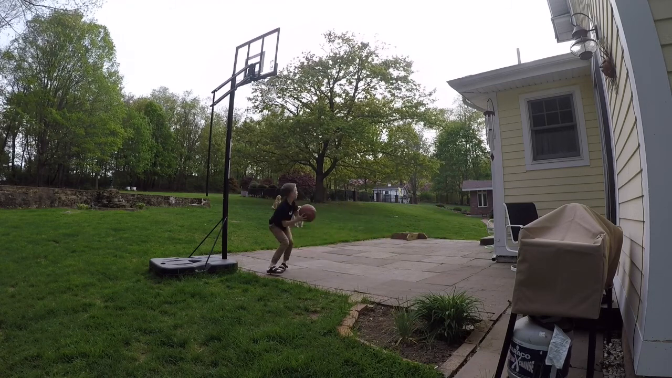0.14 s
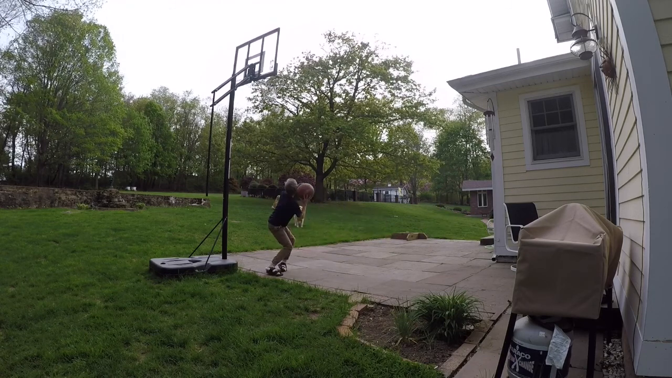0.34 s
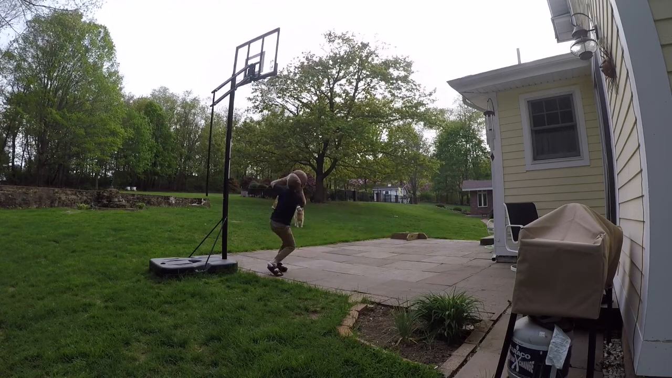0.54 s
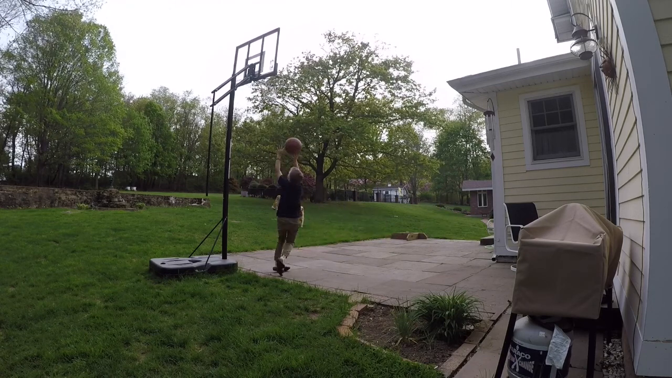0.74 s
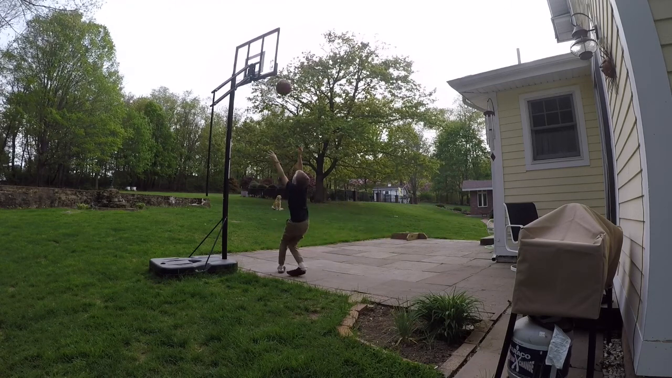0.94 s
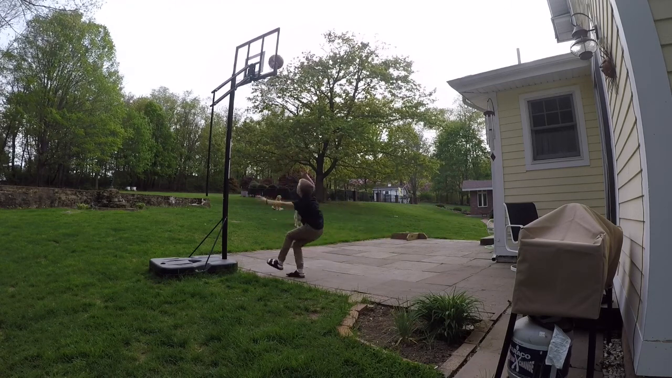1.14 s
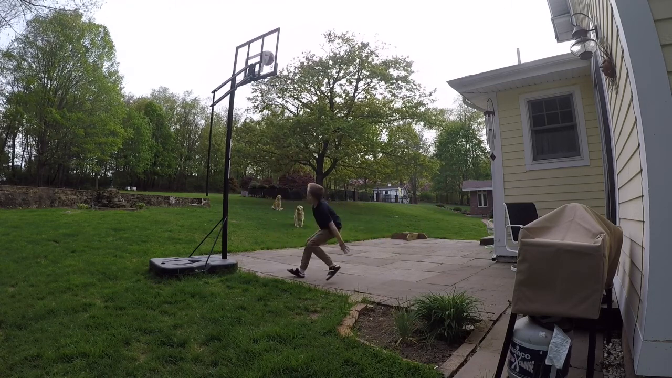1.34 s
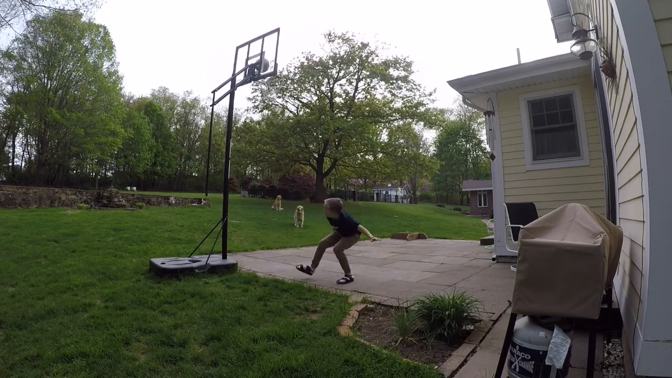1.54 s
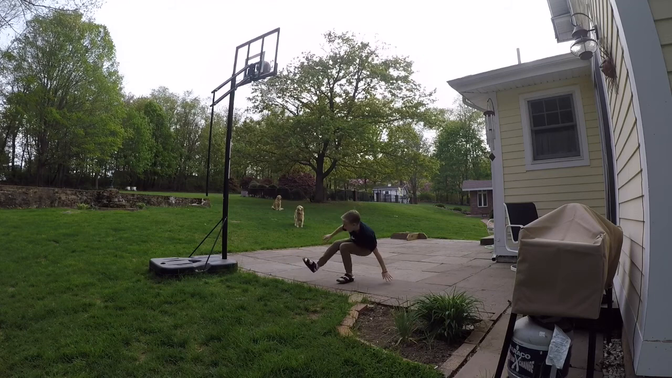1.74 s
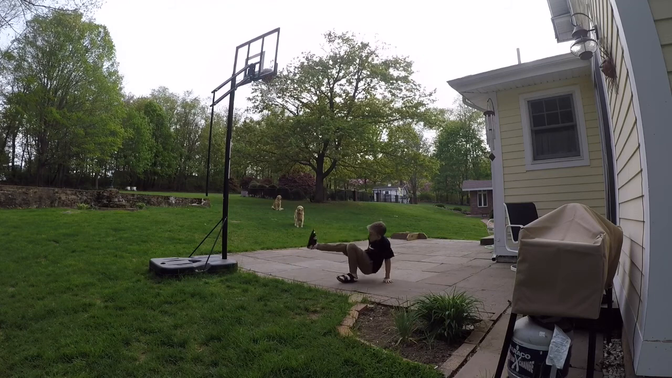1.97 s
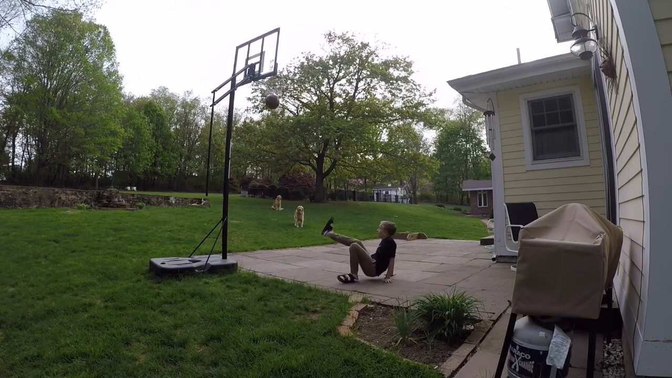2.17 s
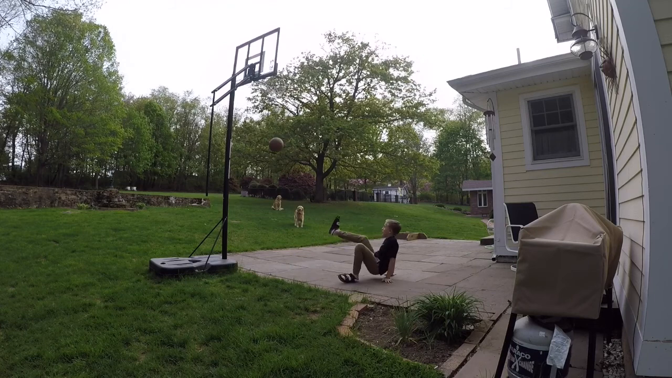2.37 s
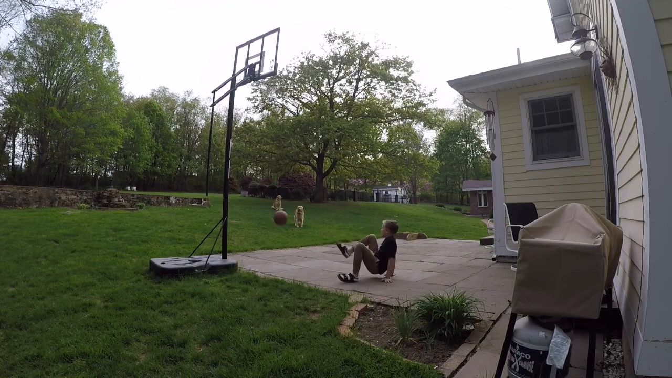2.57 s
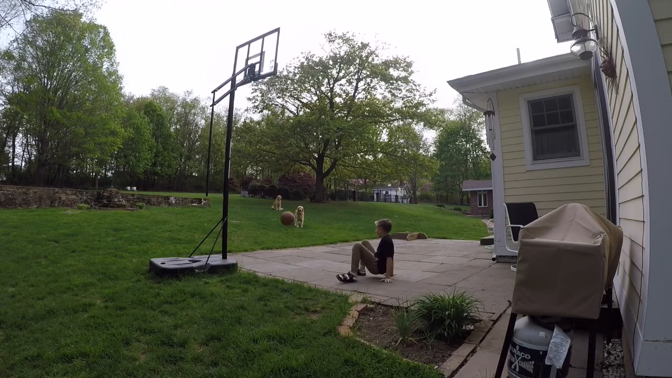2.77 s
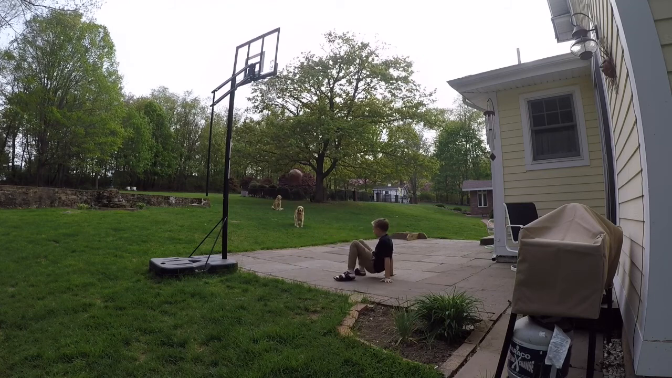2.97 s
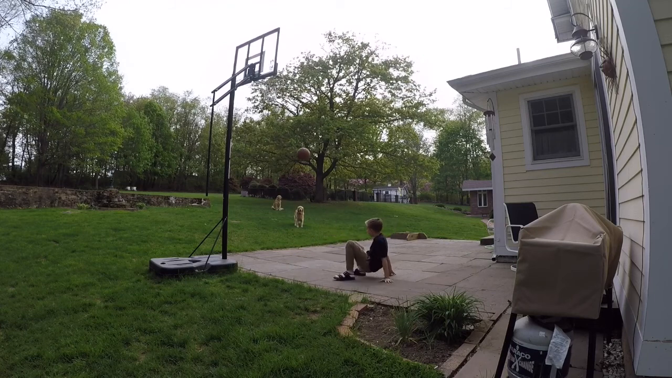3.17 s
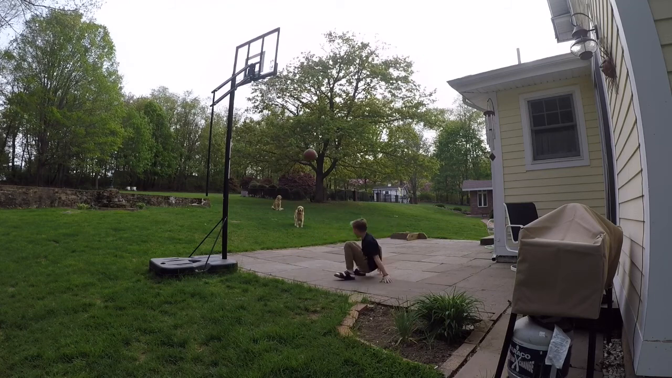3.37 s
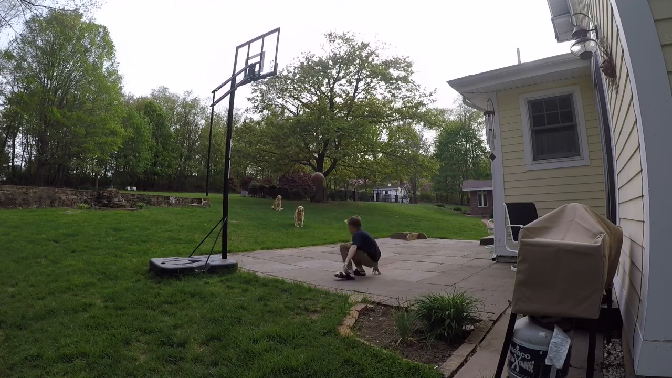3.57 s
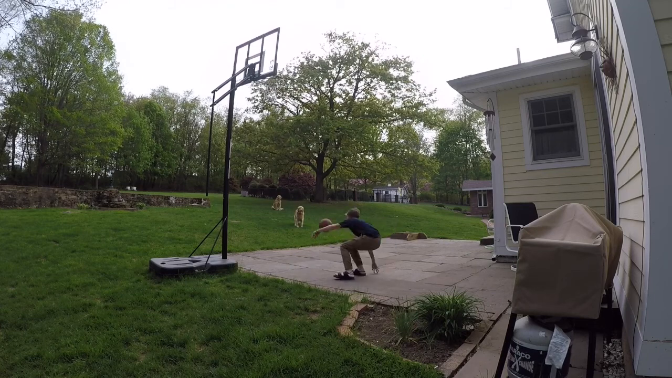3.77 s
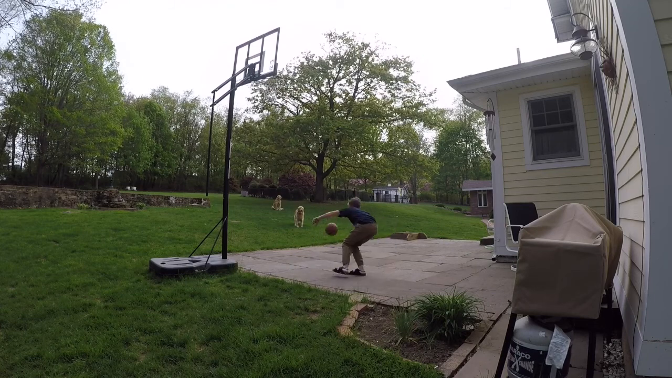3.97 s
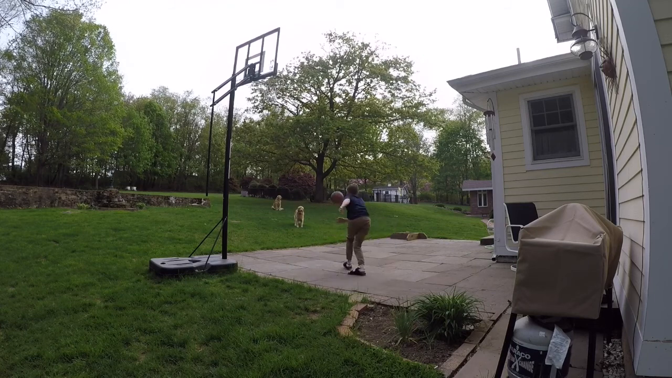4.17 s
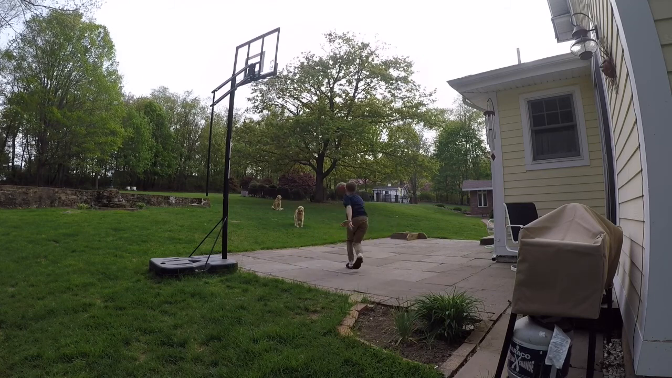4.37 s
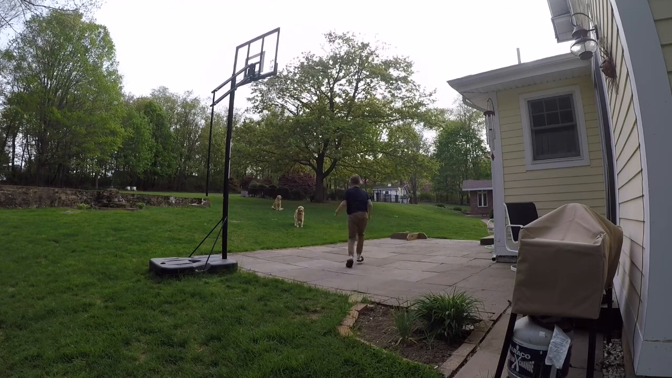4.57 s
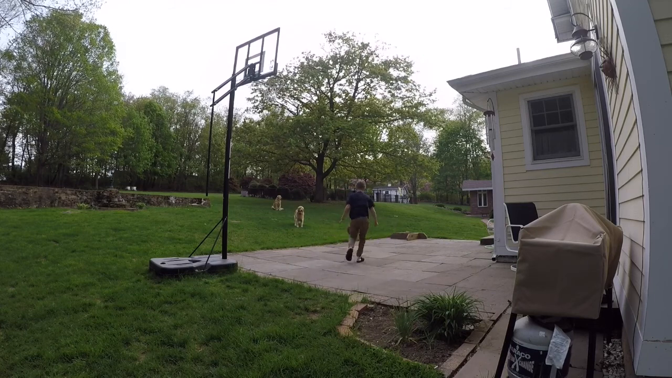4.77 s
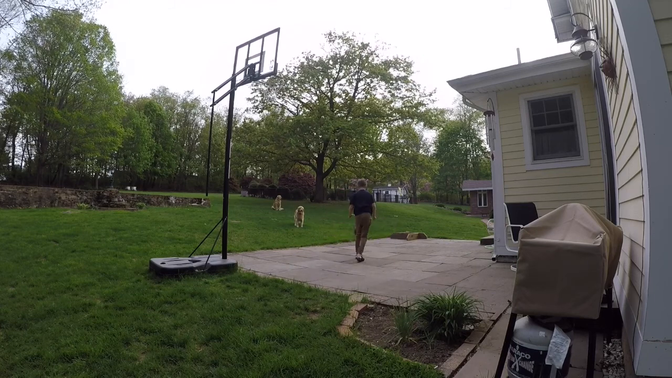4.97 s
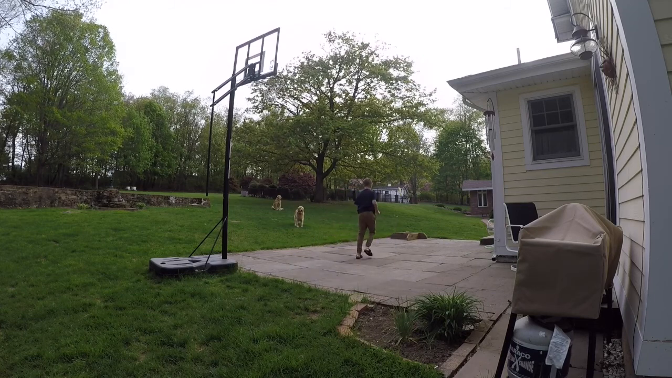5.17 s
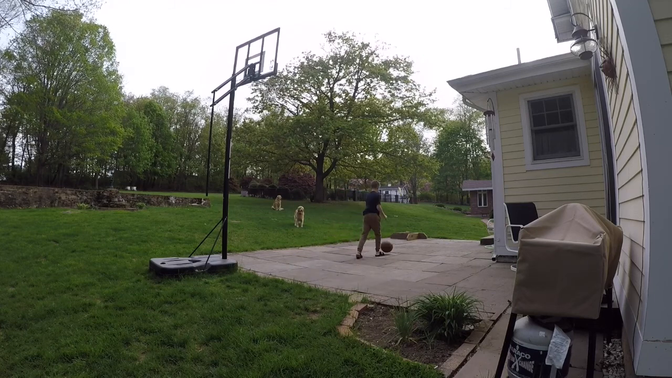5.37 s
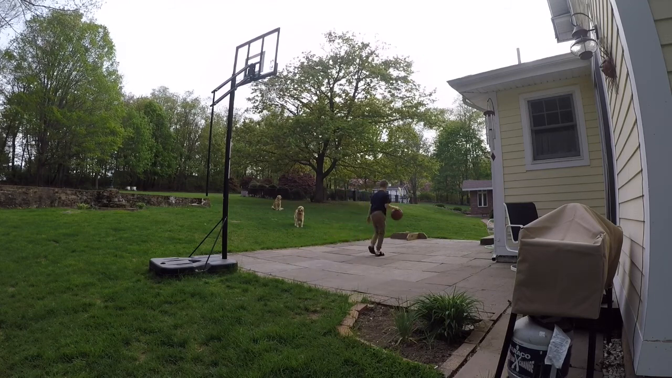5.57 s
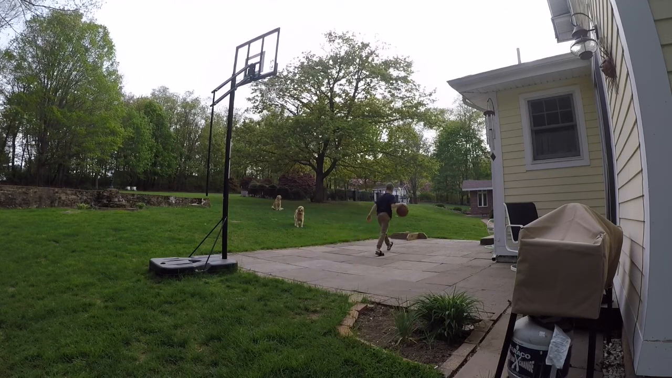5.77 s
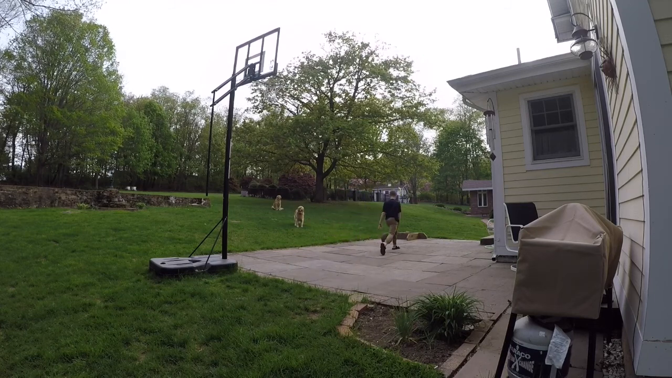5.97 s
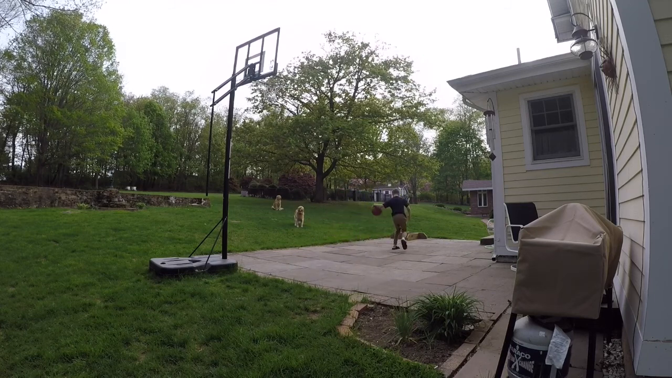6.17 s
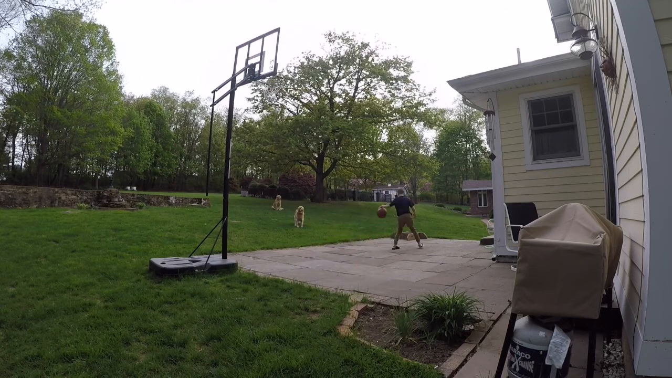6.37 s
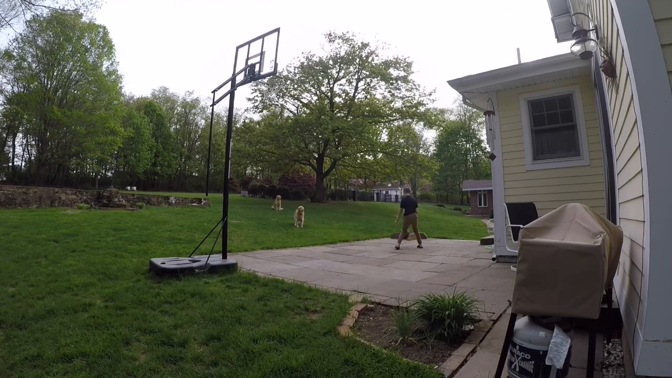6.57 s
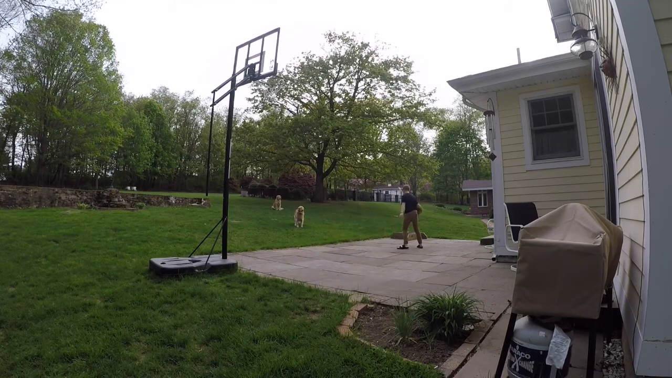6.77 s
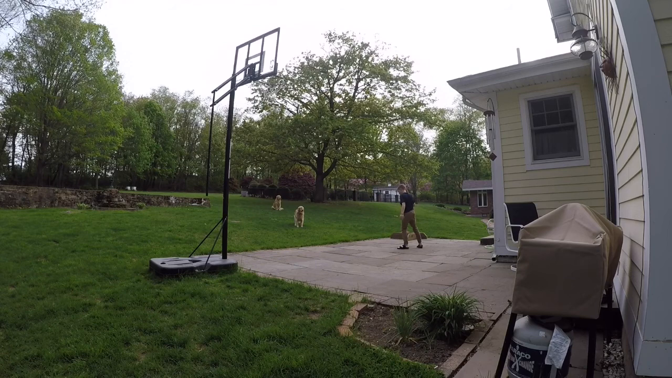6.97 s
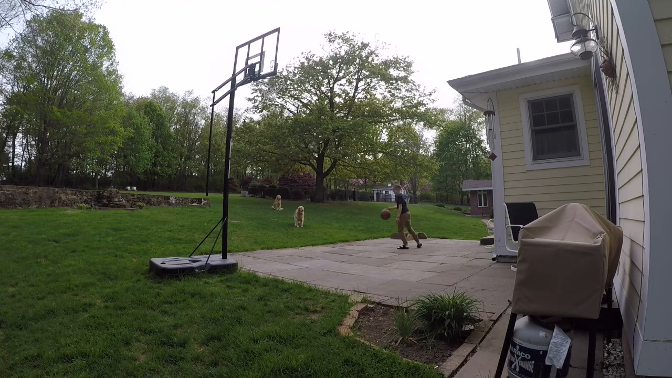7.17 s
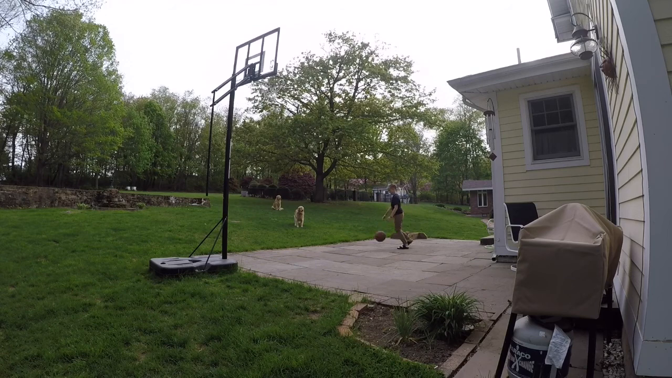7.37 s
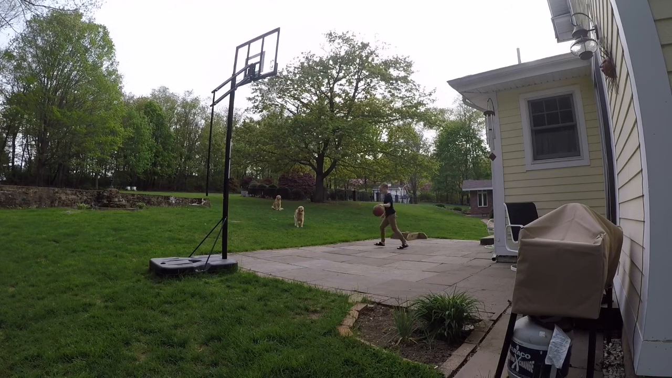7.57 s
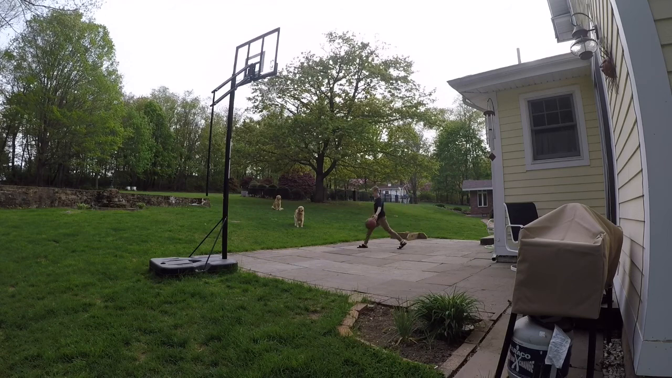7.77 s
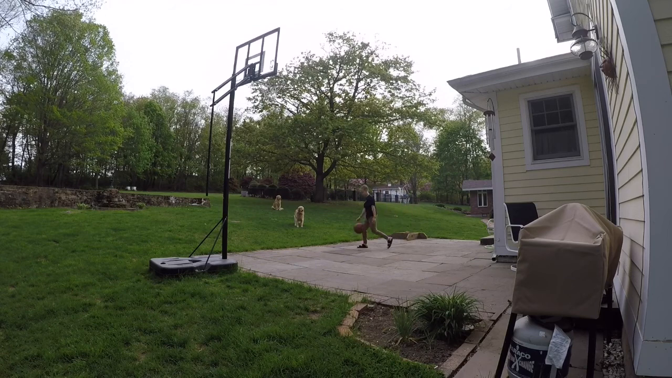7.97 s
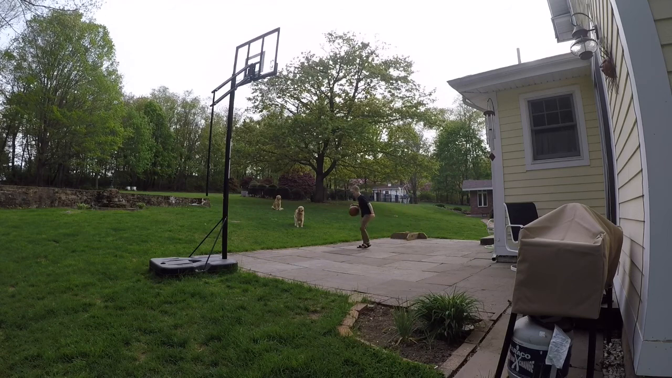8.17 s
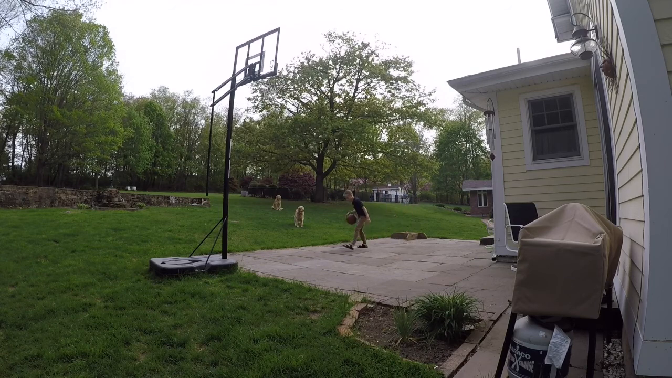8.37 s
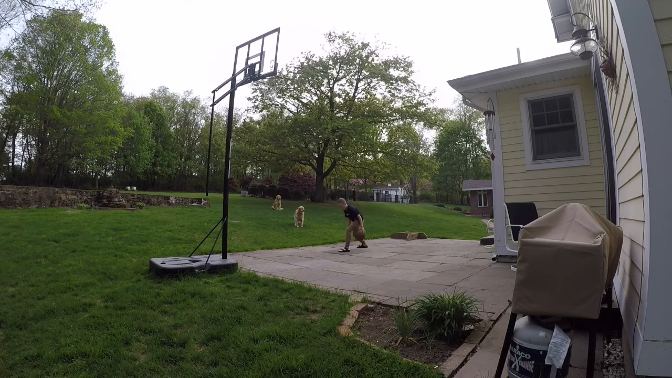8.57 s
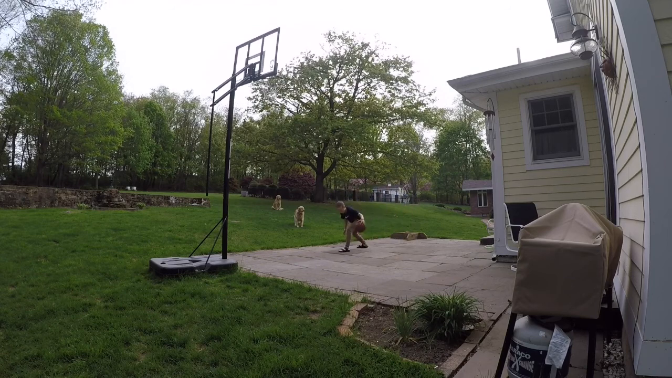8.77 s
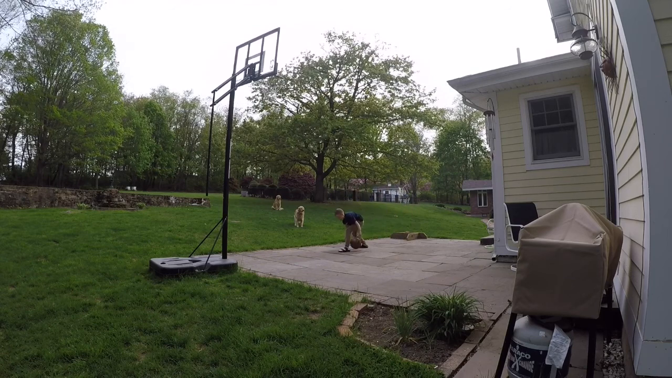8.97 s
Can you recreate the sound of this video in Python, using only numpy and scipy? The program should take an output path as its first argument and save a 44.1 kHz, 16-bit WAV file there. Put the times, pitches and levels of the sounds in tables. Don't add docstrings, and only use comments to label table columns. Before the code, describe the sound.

Outdoors, sandals skid, a hoop clatters, and a ball cracks on stone at uneven intervals above distant traffic, with a late gust buffeting the microphone.

```python
import sys
import numpy as np
from scipy import signal
from scipy.io import wavfile

SR = 44100
rng = np.random.default_rng(int(sys.argv[2]) if len(sys.argv) > 2 else 0)


def to_wav(s):
    ch = np.atleast_2d(s).T
    pcm = np.round(np.clip(ch, -1, 1) * 32767)
    wavfile.write(sys.argv[1], SR, pcm.astype(np.int16))


def voltage_ratio(decibels):
    exponent = np.asarray(decibels, float) / 20
    return 10 ** exponent


N = 397341


def rms_one(x):
    return x / np.sqrt(np.mean(x ** 2) + 1e-20)


def in_time(rows):
    s, level = np.transpose(rows)
    return np.interp(np.arange(N) / SR, s, level)


def at_hz(points, hz):
    table_hz, values = np.transpose(points)
    return np.interp(np.log(hz), np.log(table_hz + 1), values)


def passed(x, hz, kind, order=2):
    return signal.sosfilt(signal.butter(order, np.clip(hz, 10, .45 * SR), kind, fs=SR, output="sos"), x)


def drift(rate_hz):
    r = np.exp(-80 * np.pi * rate_hz / SR)
    noise = rng.standard_normal(N // 40 + 2002)
    slow = signal.lfilter([1], [1, -2 * r, r * r], noise)[2000:]
    return np.interp(np.arange(N) / 40, np.arange(len(slow)), rms_one(slow))


def ring(clicks, modes):
    out = 0
    for hz, db, t60 in modes:
        r = voltage_ratio(-60 / (t60 * SR))
        w = 2 * np.pi * hz / SR
        out = out + signal.lfilter([0, voltage_ratio(db) * np.sin(w)], [1, -2 * r * np.cos(w), r * r], clicks + 1e-18)
    return out


def add(track, s, sound):
    i = round(s * SR)
    track[i:i + len(sound)] += sound[:N - i]


def grit(size, per_s, spread_db):
    chance, size_draw, sign_draw = rng.random((size, 3)).T
    height = voltage_ratio(-spread_db * np.log(size_draw + 0.011))
    return (chance < per_s / SR) * height * np.sign(sign_draw - .5)


def ball():
    # (time [s], crack [dB], deep thump [dB], high thump [dB], enclosed air [dB])
    bounces = [
        (2.7182, 2.5, -14, -24.5, -17.5),
        (3.9289, -3.5, -20, -20, -19.5),
        (4.911, -11, -22.5, -25, -22),
        (5.4117, -1, -23, -22.5, -21),
        (5.9937, -2, -19.5, -15.5, -16),
        (6.5864, -22, -23, -19.5, -22.5),
        (7.3836, -6.5, -23, -10.5, -20),
        (7.9318, -9, -20, -15.5, -21.5),
        (8.5681, -7.5, -19, -8.5, -21.5),
    ]
    # (pitch [Hz], level [dB], time to fall 60 dB [s])
    shell_deep = [(152, 8, 0.083), (176, -15.5, 0.2)]
    shell_high = [(269, -7, 0.061), (263, 7.5, 0.057)]
    shell_knock = [(472, 0, 0.012), (475.4, 0, 0.15), (690, 0, 0.02), (895, 0.92, 0.031)]
    crack_hz, dulling_octaves_per_db = 4720, .04
    deep_lag_s, high_lag_s = 0.002, 0.00273
    hit, bare, t = np.zeros(N), np.zeros(N), np.arange(6000) / SR
    push = np.sin(np.pi * np.clip(t / 0.00094, 0, 1)) / (0.0012 * SR)
    click = (t == t[20]) * 1.
    for s, crack_db, deep_db, high_db, air_db in bounces:
        flat_db = high_db + 22
        upper_db = air_db + 1.5 + 0.21 * flat_db
        skin_db = -22 - 0.44 * flat_db
        peeling = rng.standard_normal(len(t)) * np.exp(-t / .0016) * (t > t[26])
        patter = click + .15 * peeling
        crack_band = crack_hz * 2 ** (np.array([-.6, .6]) - dulling_octaves_per_db * flat_db)
        crack = voltage_ratio(crack_db + 11) * passed([patter, click], crack_band, "band", order=1)
        skin = voltage_ratio(skin_db + 29) * passed([patter, click], [1400, 3600], "band")
        skin_hz = 2100 * rng.uniform(1.0, 1.103)
        tones = ring(click, [(1154, air_db, .02), (1462, upper_db, .018), (skin_hz, skin_db + 4, .008)])
        add(hit, s, crack[0] + skin[0] + tones + voltage_ratio(-37.5) * ring(click, shell_knock))
        add(hit, s + deep_lag_s, -voltage_ratio(deep_db + 6.5) * ring(push, shell_deep))
        add(hit, s + high_lag_s, -voltage_ratio(high_db - 7) * ring(push, shell_high))
        add(bare, s, crack[1] + skin[1])
    return hit, bare


def hoop():
    # (time [s], peak [dB], low body [dB])
    knocks = [
        (1.5276, -21.5, -25),
        (1.5454, -27, -22.5),
        (1.578, -16.5, -21),
        (1.5975, -16.5, -28),
        (1.6213, -26, -50),
        (1.6448, -31, -27.5),
        (1.73, -29, -31),
        (1.824, -29, -29),
        (1.8653, -22, -30.5),
        (2.0037, -34.5, -37.5),
    ]
    # (pitch [Hz], level [dB], time to fall 60 dB [s])
    board_tones = [(168.2, 1.5, 0.4), (272.6, -1, 0.21), (357, 2, 0.11), (394, -2.5, 0.26), (440, 0, 0.053),
                   (743, -2, 0.18)]
    rim_tones = [(1000, 0, .03), (1180, -2, .04), (1750, 0, .03), (3485, -12, .06), (3750, -10, .02),
                 (4250, -12, .05)]
    chatter_t60_s = 0.22
    out, t = np.zeros(N), np.arange(16000) / SR
    for s, db, low_db in knocks:
        chatter = grit(len(t), 4000, 4) * voltage_ratio(-60 * t / chatter_t60_s) * np.clip(t / .003, 0, 1)
        bright = passed(chatter, [2600, 6500], "band", order=1)
        hollow = voltage_ratio(11.5 + .25 * (low_db + 20.5)) * passed(chatter, [500, 2000], "band", order=1)
        rim = voltage_ratio(db - 6.5) * (bright + hollow + 0.038 * ring(chatter, rim_tones))
        add(out, s, rim + voltage_ratio(low_db - 33.5) * ring(chatter, board_tones))
    return out


def squeaks():
    # (time [s], level [dB], pitch [Hz], length [s])
    squeak_times = [
        (2.062, -42, 1306, 0.013),
        (2.075, -52, 1270, 0.032),
        (2.176, -40.5, 1280, 0.019),
        (2.189, -48, 1266, 0.032),
    ]
    # (multiple of the pitch, level [dB])
    overtones = [(1, 0.5), (2, -3), (3, -6), (4, -12.5)]
    out, t = np.zeros(N), np.arange(3000) / SR
    for s, db, hz, length in squeak_times:
        trembling_hz = hz * (1 + 0.22 * rng.standard_normal(len(t)))
        turn = 2 * np.pi * np.cumsum(trembling_hz) / SR
        shape = np.clip(t / 0.0024, 0, 1) * np.exp(-(t / length) ** 2)
        add(out, s, voltage_ratio(db) * shape * sum(voltage_ratio(p_db) * np.sin(k * turn) for k, p_db in overtones))
    return out


def pings():
    # (time [s], pitch [Hz], level [dB], time to fall 60 dB [s])
    rods = [
        (1.885, 3485, -48, .3),
        (1.63, 3500, -44, .12),
        (1.83, 4280, -50, .15),
        (2.79, 4300, -53, .6),
        (7.41, 3550, -58, .25),
    ]
    out, t = np.zeros(N), np.arange(20000) / SR
    for s, hz, db, t60 in rods:
        add(out, s, voltage_ratio(db - 60 * t / t60) * np.clip(t / 0.0074, 0, 1) * np.sin(2 * np.pi * hz * t))
    return out


def slaps():
    # (time [s], snap [dB], pitch
    # [Hz], pitch level [dB], body [dB])
    slap_times = [(0.21, -23.5, 850, -43.5, -36.5), (1.472, -18, 942, -60, -25),
                  (2.151, -38, 1580, -44, -58), (2.7495, -18, 1490, -31, -31),
                  (2.7572, -24, 1310, -29, -33), (4.283, -27.5, 1610, -40.5, -39),
                  (4.7243, -28, 1180, -36.5, -35), (5.044, -25.5, 1370, -36, -48),
                  (5.403, -42, 1110, -37, -28), (6.487, -26, 1220, -23.5, -59),
                  (7.477, -46, 1700, -58, -58), (7.8152, -17, 1220, -21, -48), (8.109, -35, 1190, -50, -56),
                  (8.53, -54, 1040, -35, -49), (8.5457, -23.5, 1900, -43, -55)]
    slap_s, wall_delay_s, wall_db = 0.003, 0.017, -10
    out, t = np.zeros(N), np.arange(2500) / SR
    for s, snap_db, hz, pitch_db, body_db in slap_times:
        burst = rng.standard_normal(len(t)) * np.exp(-t / slap_s) * .18 + (t == t[8]) * 1.5
        snap = voltage_ratio(snap_db + 10.5) * passed(burst, [1700, 5000], "band", order=1)
        body = voltage_ratio(body_db + 2.5) * ring(burst, [(475, 0, 0.0076), (705, 0, 0.007)])
        pitches = ring(burst, [(hz, 0, .006), (1.43 * hz, -4, .005), (2.7 * hz, -14, .002)])
        slap = snap + voltage_ratio(pitch_db + 7.5) * pitches + body
        add(out, s, slap)
        add(out, s + wall_delay_s, voltage_ratio(wall_db) * passed(slap, 1000, "high", order=1))
    return out


def sand(size, hz):
    grains = grit(size, 5000, 5)
    crunch = passed(grains, [hz * 0.62, hz * 1.44], "band")
    return rms_one(crunch + 0.59 * passed(grains, [1300, 4000], "band", order=1))


def scuffs():
    # (time [s], level [dB])
    slide = [
        (0.53, -64.5),
        (0.708, -41.5),
        (0.73, -50.5),
        (0.792, -32.5),
        (0.832, -34.5),
        (0.844, -46),
        (0.952, -62),
        (0.976, -49),
        (1.03, -60),
    ]
    # (time [s], peak [dB], length [s])
    drags = [
        (2.928, -42, 0.097),
        (3.189, -46, 0.05),
        (8.038, -41, .043),
    ]
    # (time [s], peak [dB])
    flicks = [
        (1.415, -30),
        (3.7633, -45),
        (4.2604, -40),
        (4.6907, -33.5),
        (5.02, -40),
        (5.378, -31),
        (5.908, -41),
        (6.467, -41),
        (7.779, -43),
    ]
    slide_hz, flick_hz, flick_s = 5020, 5340, 0.024
    out, t = np.zeros(N), np.arange(6000) / SR
    s, db = np.transpose(slide)
    skid_t = np.arange(s[0], s[-1], 1 / SR)
    add(out, s[0], voltage_ratio(np.interp(skid_t, s, db) + 1.0) * sand(len(skid_t), slide_hz))
    strokes = [(s, db, slide_hz, length) for s, db, length in drags]
    strokes += [(s, db, flick_hz, flick_s) for s, db in flicks]
    for s, db, hz, length in strokes:
        stroke = np.clip(t / .005, 0, 1) * np.clip((length - t) / .012, 0, 1)
        add(out, s, voltage_ratio(db - 10) * stroke * sand(len(t), hz))
    return out


def with_echoes(x):
    # (delay [s], level [dB], dull above [Hz])
    walls = [(.009, -11.5, 5000), (0.019, -15, 3000), (.048, -11.5, 375), (0.053, -25.5, 7000)]
    out = x
    for delay, db, dull_hz in walls:
        out = out + voltage_ratio(db) * np.roll(passed(x, dull_hz, "low", order=1), round(delay * SR))
    return out


def yard(x):
    # (time to fall 60 dB [s], level [dB], lowest [Hz], highest [Hz])
    tails = [(0.068, -32, 856, 8100), (.6, -41, 1470, 7000)]
    t = np.arange(SR) / SR
    tail = 0
    for t60, db, low_hz, high_hz in tails:
        noise = passed(rng.standard_normal((2, SR)), [low_hz, high_hz], "band", order=1)
        tail = tail + voltage_ratio(db - 60 * t / t60) * noise
    trees = voltage_ratio(4 * np.exp(-((t - 0.13) / 0.016) ** 2))
    return signal.fftconvolve(x[None], tail * np.clip(t / 0.0018, 0, 1) * trees, axes=1)[:, :N]


def housing(x):
    wind_filter = signal.butter(6, 150, "high", fs=SR, output="sos")
    return signal.sosfiltfilt(wind_filter, passed(x, 6100, "low", order=5) + 0.036 * x)


def port(x, peaks):
    for hz, width_hz, db in peaks:
        a, w = voltage_ratio(db / 2), 2 * np.pi * hz / SR
        k = np.pi * width_hz / SR
        x = signal.lfilter([1 + k * a, -2 * np.cos(w), 1 - k * a], [1 + k / a, -2 * np.cos(w), 1 - k / a], x)
    return x


def low_noise(low_hz, high_hz, side, order):
    mid, apart = passed(rng.standard_normal((2, N)), [low_hz, high_hz], "band", order=order)
    return rms_one(mid + side * apart * [[1], [-1]])


def wind():
    # (time [s], level [dB])
    breeze = [(0, -70.5), (2.7, -76), (2.87, -55), (3.4, -73), (4.0, -71.5), (6.1, -73), (6.7, -54),
              (7.25, -47.5), (7.9, -39), (8.1, -39.5), (8.4, -43.5), (9.01, -41)]
    # (time [s], level [dB])
    puffs = [(7.39, -33), (7.63, -43), (7.73, -45), (7.84, -59), (7.94, -29), (8.05, -50), (8.45, -38),
             (8.57, -37), (8.66, -32.5), (8.76, -39), (8.87, -44), (8.96, -40)]
    puff_s = 0.02
    t = np.arange(N) / SR
    strength = voltage_ratio(in_time(breeze))
    for s, db in puffs:
        strength = strength + voltage_ratio(db) * np.exp(-((t - s) / puff_s) ** 2)
    lumps = passed(low_noise(22, 140, side=.28, order=1), 150, "low", order=4)
    return strength * voltage_ratio(4.5 + 1.8 * drift(20)) * lumps


def hum():
    # (time [s], level [dB])
    hum_levels = [
        (0, -42),
        (2.6, -41),
        (3.1, -46.5),
        (4.1, -48.5),
        (5.2, -43.5),
        (6.9, -51),
        (9.01, -51.5),
    ]
    start_hz, rise_hz_per_s, top_hz = 223.5, 1.0, 229.7
    hz = np.minimum(start_hz + rise_hz_per_s * np.arange(N) / SR, top_hz)
    tone = np.sin(2 * np.pi * np.cumsum(hz + 1.08 * drift(4.22)) / SR)
    tone = tone * voltage_ratio(in_time(hum_levels) + 1 + 0.5 * drift(2.6))
    return tone * voltage_ratio([[1.5], [-1.5]])


def traffic():
    # (frequency [Hz], level [dB per Hz])
    wash_levels = [(250, -2), (330, 1.5), (420, -1.5), (620, -2.5), (900, -3.5), (1400, -7.5),
                   (2000, -16.5), (3000, -16.5), (5000, -21.5), (8000, -23.5), (10500, -27), (12000, -34),
                   (15000, -43)]
    # (frequency [Hz], left-right likeness [-1 to 1])
    likeness = [(250, 0.0021), (350, 0.083), (600, -0.099), (850, -0.56), (1400, -0.14), (2200, -0.12),
                (3500, 1), (4800, 0.28), (6500, -0.031)]
    # (frequency [Hz], left minus right [dB])
    tilt = [(60, -1.5), (110, 0.5), (200, -1.5), (380, 4), (700, 2.5), (1290, -4.5), (2380, -1.0),
            (4400, 0.5), (8120, -4), (15000, -2)]
    out, edges, white = 0, 250 * 2 ** np.arange(0, 6.3, .5), rng.standard_normal((2, 2, N))
    for k, (low, high) in enumerate(zip(edges, edges[1:])):
        mid, side = passed(white[k % 2], [low, high], "band")
        hz = np.sqrt(low * high)
        alike, tilt_db = np.clip(at_hz(likeness, hz), -.95, .95), at_hz(tilt, hz)
        pair = np.sqrt(1 + alike) * mid + np.sqrt(1 - alike) * side * [[1], [-1]]
        level_db = at_hz(wash_levels, hz) - 10 * np.log10(1 + alike) + .7 * drift(4)
        out = out + voltage_ratio(level_db) * pair * voltage_ratio([[tilt_db / 2], [-tilt_db / 2]])
    return rms_one(out)


def rumble():
    fade_db = -0.51 * np.arange(N) / SR
    return voltage_ratio(-46.5 + fade_db) * low_noise(132.2, 240.5, side=0.52, order=6)


def scene():
    # (frequency [Hz], width [Hz], level [dB])
    left_port = [(280, 350, 3), (1350, 450, -9)]
    right_port = [(640, 300, -8), (1200, 700, 5)]
    hit, bare = ball()
    others = slaps() + hoop() + squeaks() + scuffs() + pings()
    near = housing(with_echoes(hit) + others)
    direct = np.array([port(near, left_port), port(near, right_port)])
    scattered = housing(yard(bare + .5 * others))
    wash = voltage_ratio(-45) * passed(traffic(), 14500, "low", order=8)
    return direct + scattered + wash + rumble() + wind() + hum()


def low_pass(x):
    return signal.sosfilt(signal.butter(12, 16530, fs=SR, output="sos"), x)


def record(dry):
    return low_pass(dry)


dry = scene()
out = record(dry)
to_wav(out)
```